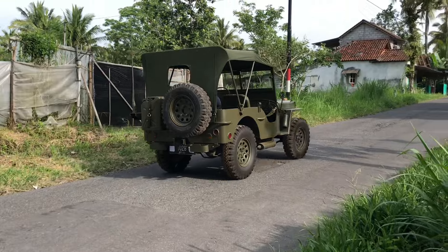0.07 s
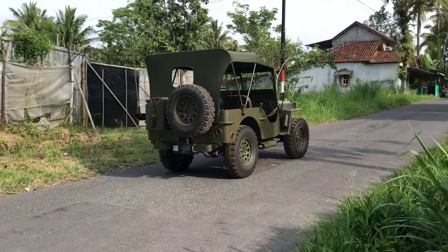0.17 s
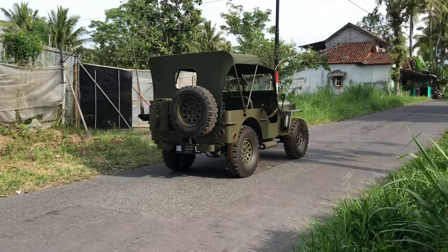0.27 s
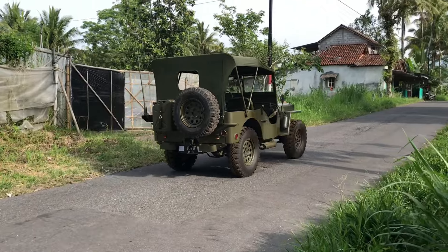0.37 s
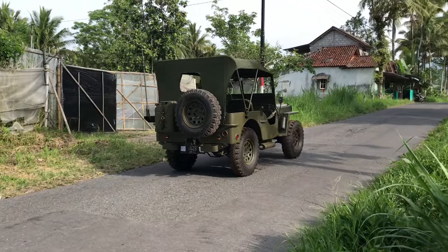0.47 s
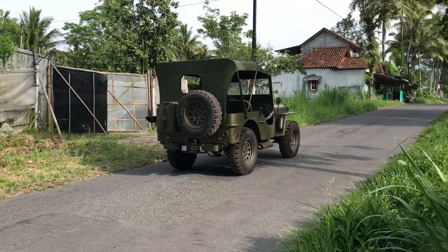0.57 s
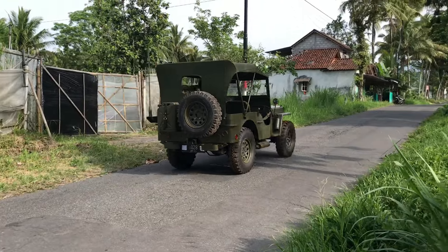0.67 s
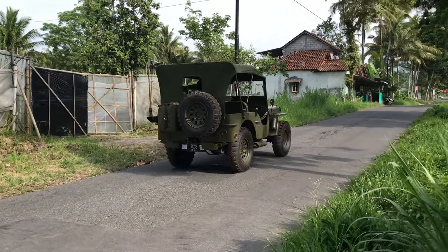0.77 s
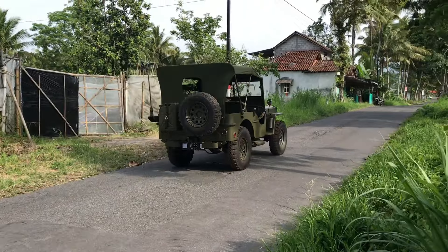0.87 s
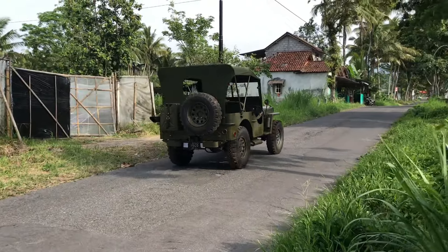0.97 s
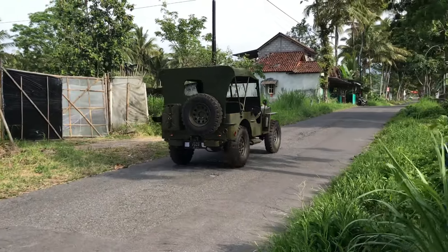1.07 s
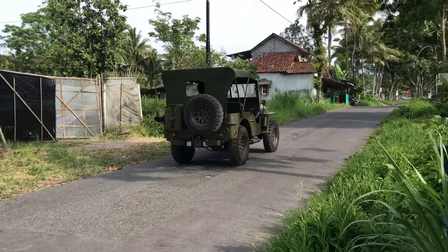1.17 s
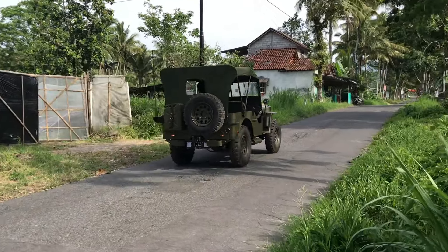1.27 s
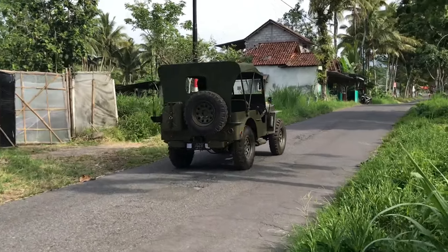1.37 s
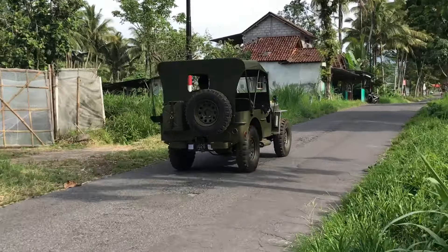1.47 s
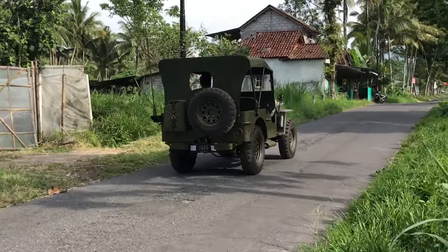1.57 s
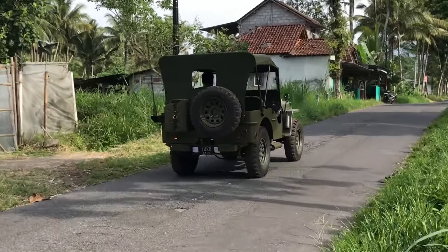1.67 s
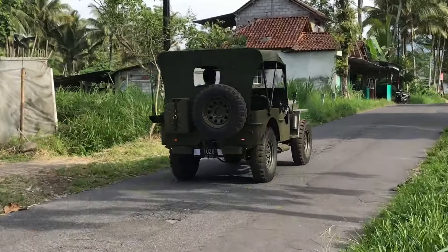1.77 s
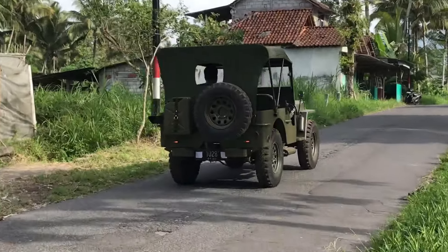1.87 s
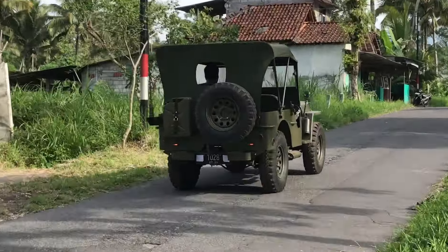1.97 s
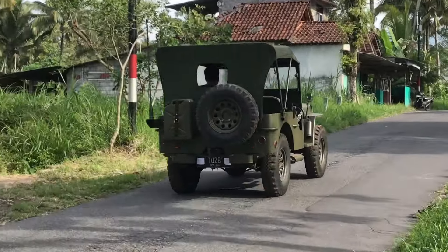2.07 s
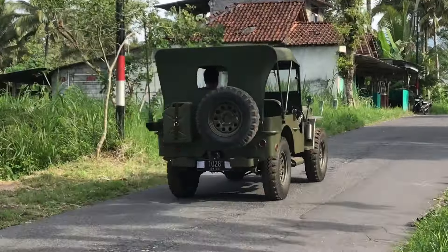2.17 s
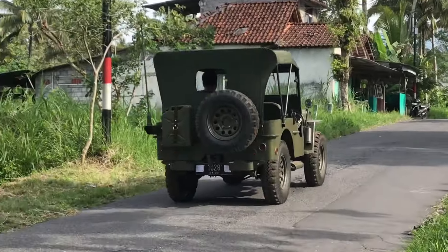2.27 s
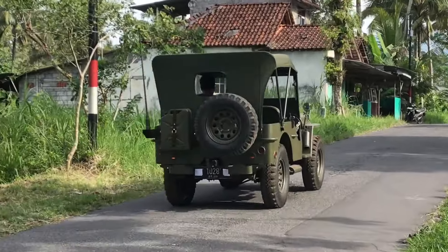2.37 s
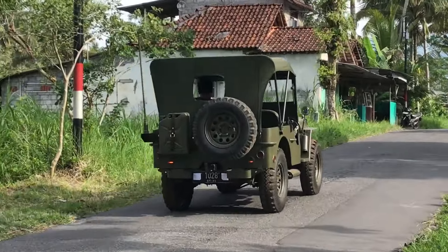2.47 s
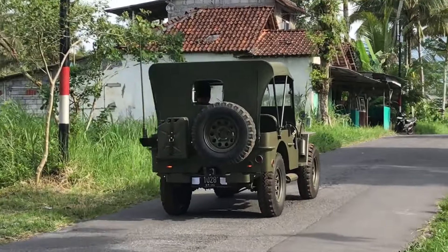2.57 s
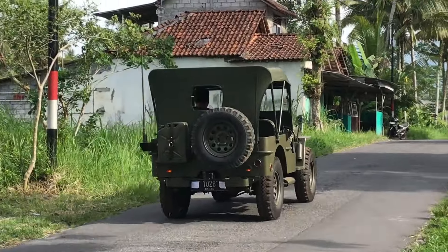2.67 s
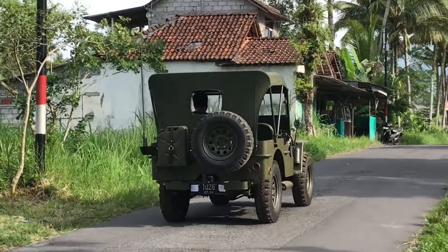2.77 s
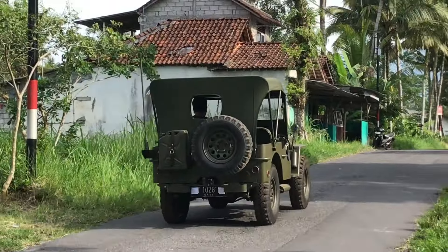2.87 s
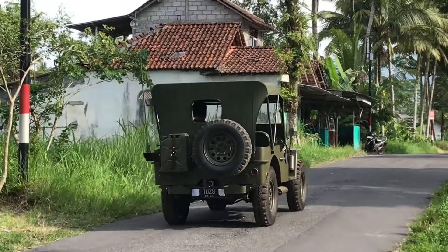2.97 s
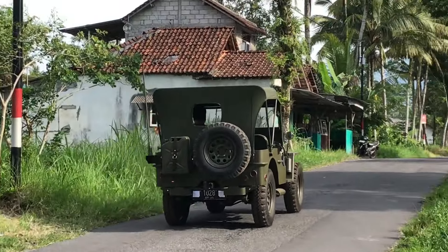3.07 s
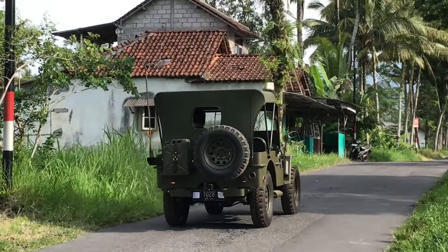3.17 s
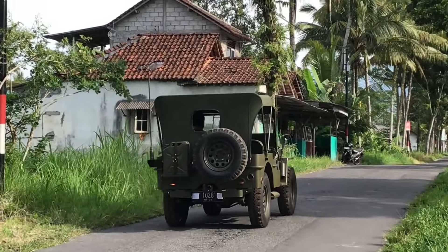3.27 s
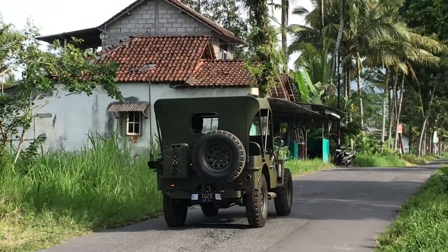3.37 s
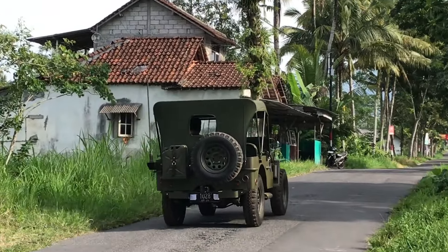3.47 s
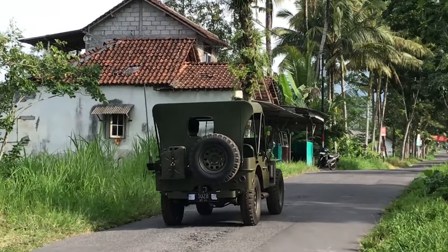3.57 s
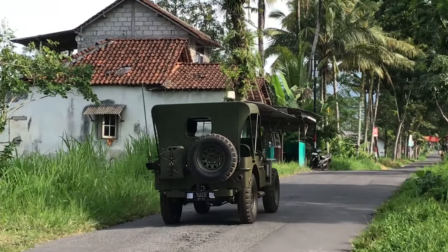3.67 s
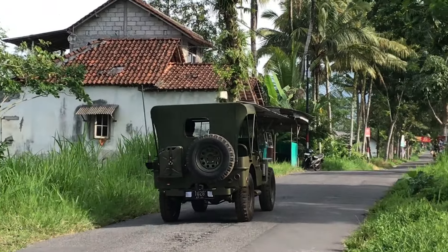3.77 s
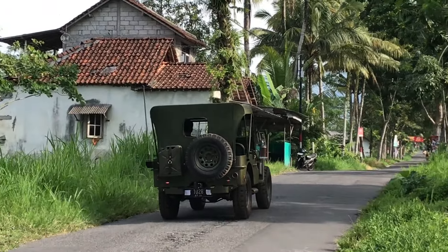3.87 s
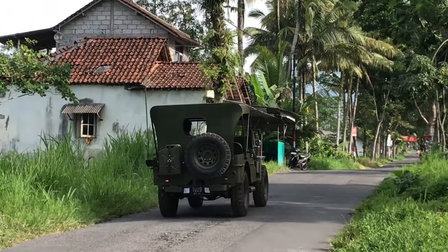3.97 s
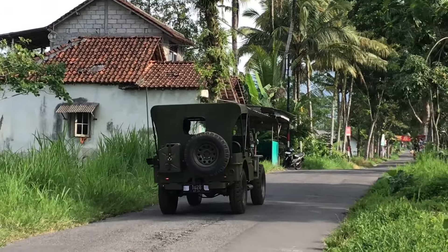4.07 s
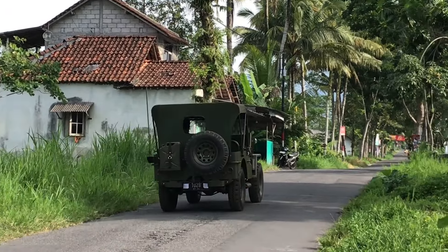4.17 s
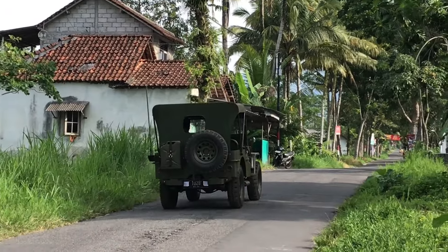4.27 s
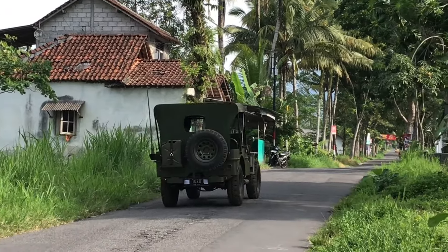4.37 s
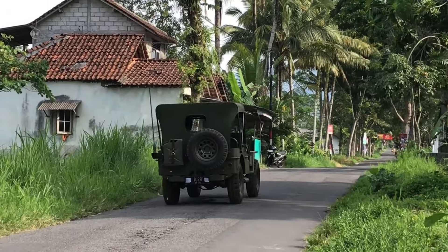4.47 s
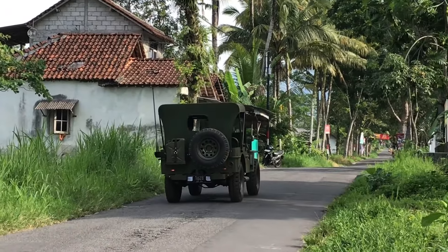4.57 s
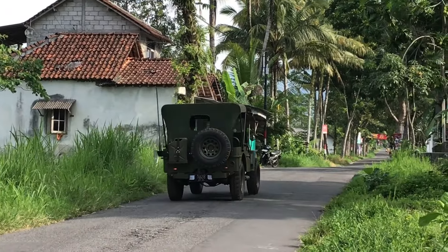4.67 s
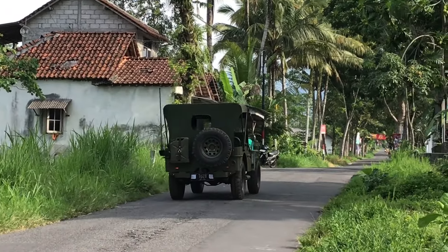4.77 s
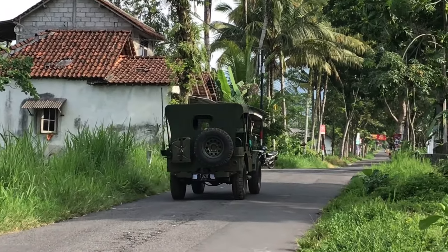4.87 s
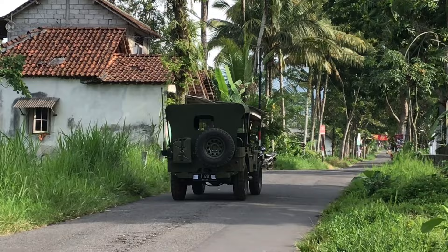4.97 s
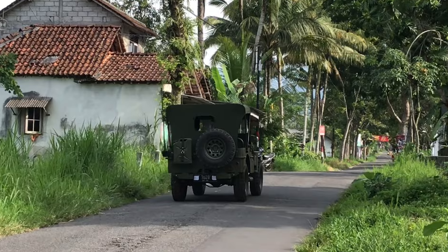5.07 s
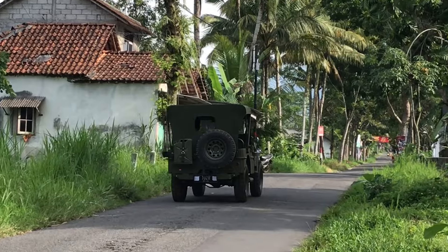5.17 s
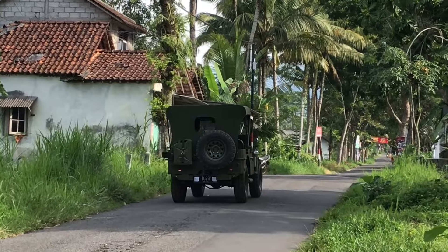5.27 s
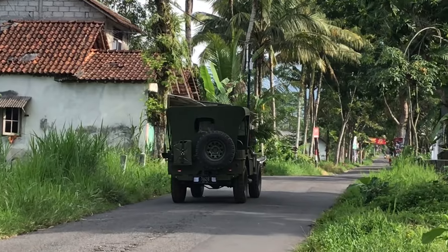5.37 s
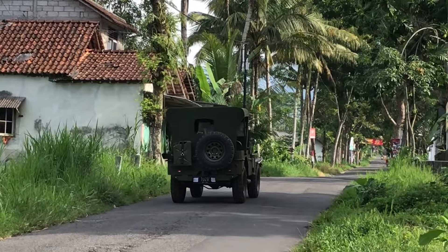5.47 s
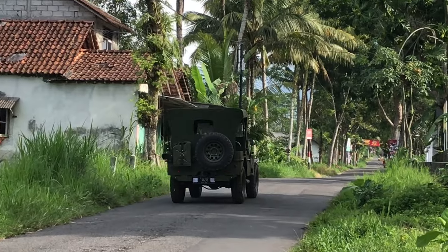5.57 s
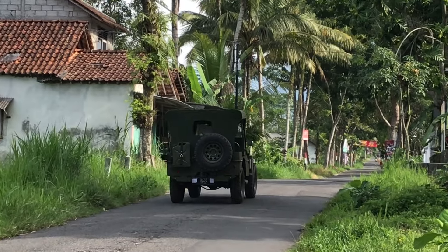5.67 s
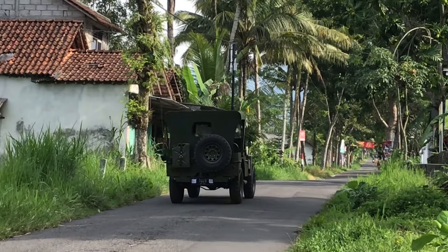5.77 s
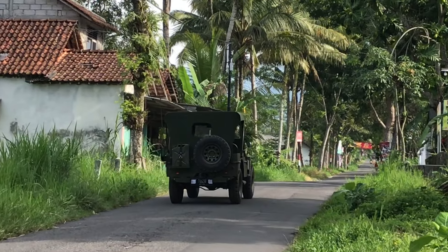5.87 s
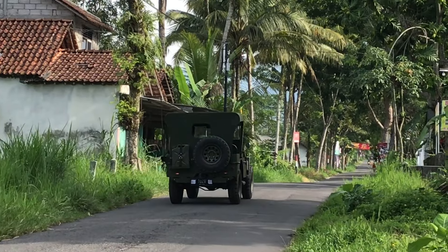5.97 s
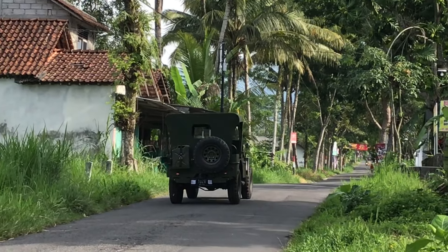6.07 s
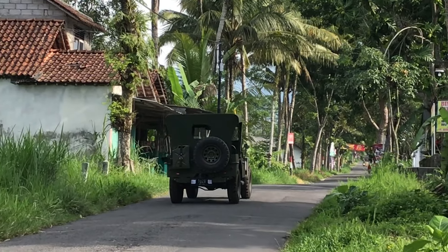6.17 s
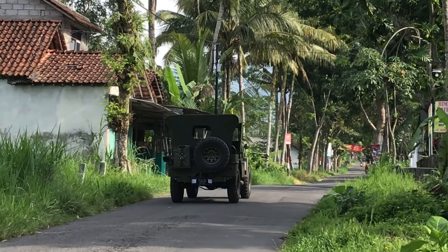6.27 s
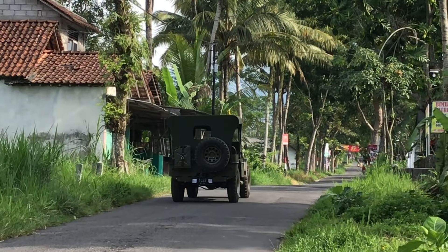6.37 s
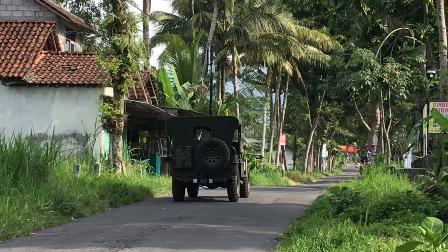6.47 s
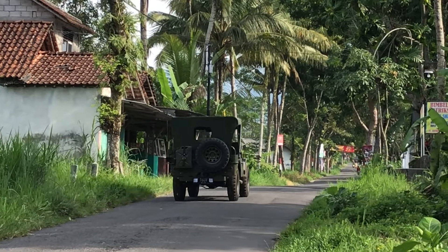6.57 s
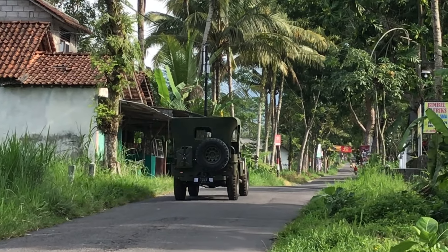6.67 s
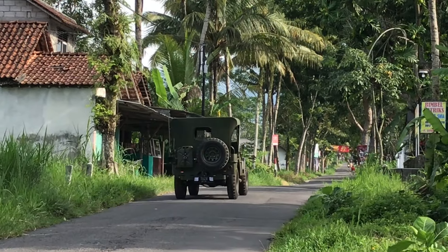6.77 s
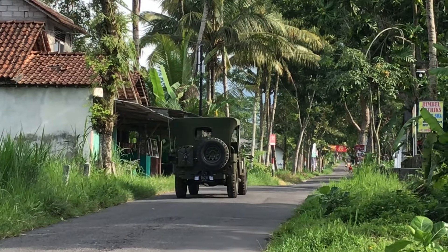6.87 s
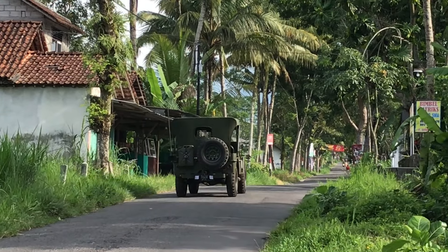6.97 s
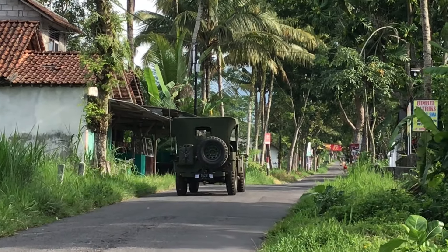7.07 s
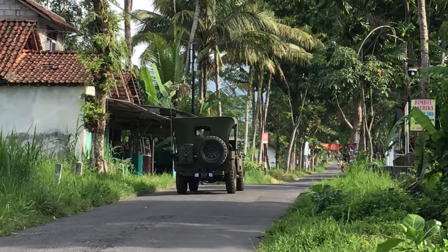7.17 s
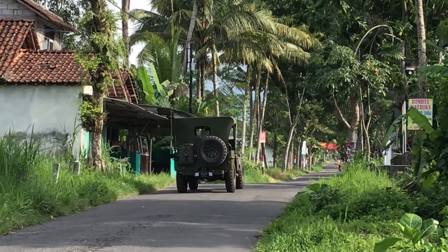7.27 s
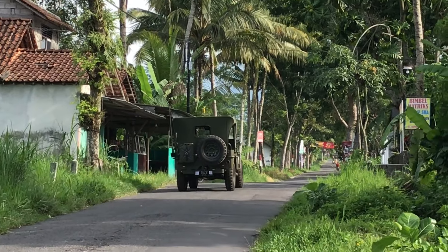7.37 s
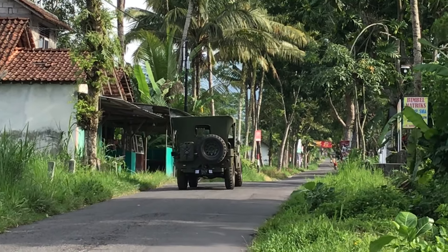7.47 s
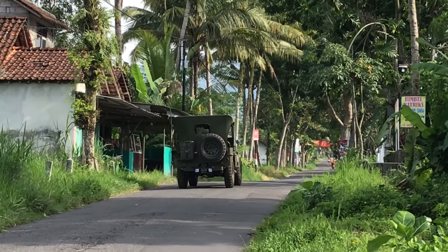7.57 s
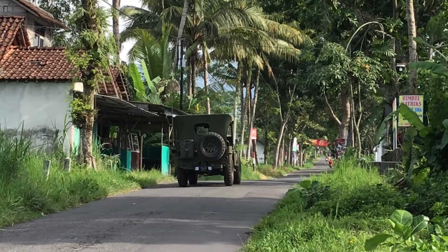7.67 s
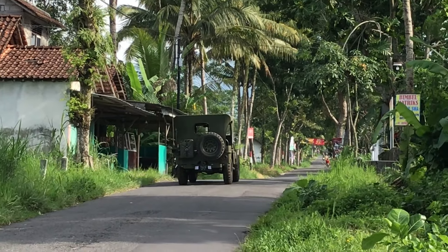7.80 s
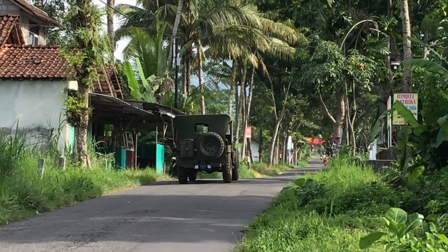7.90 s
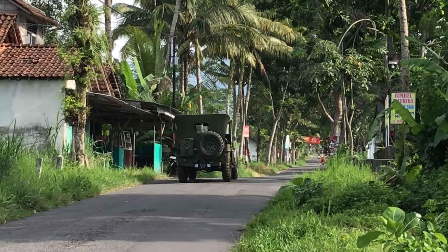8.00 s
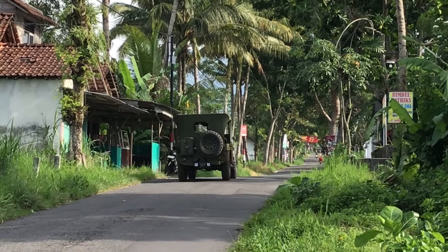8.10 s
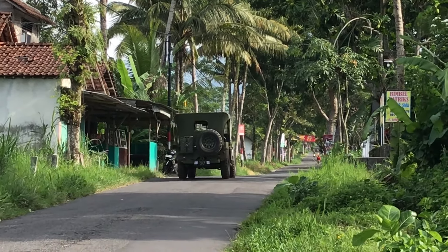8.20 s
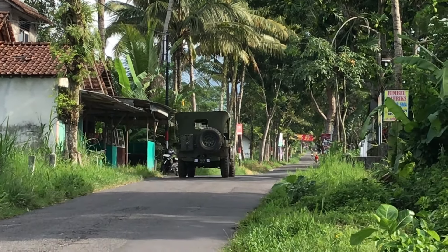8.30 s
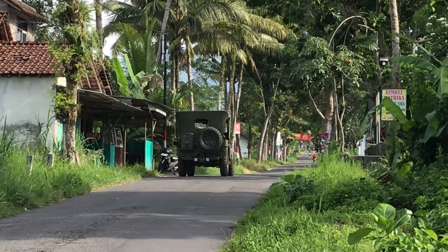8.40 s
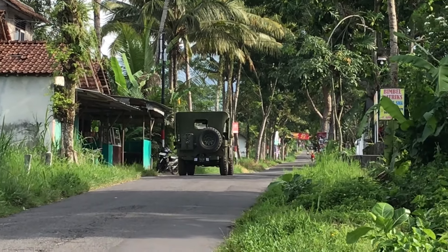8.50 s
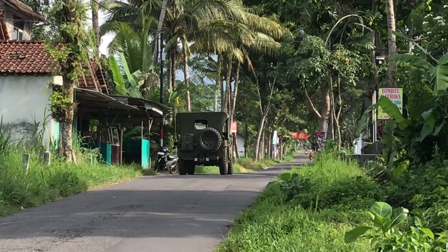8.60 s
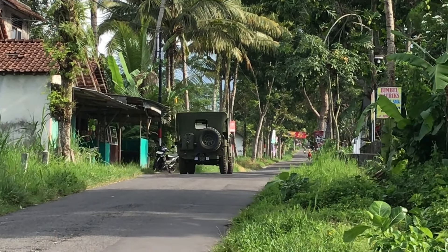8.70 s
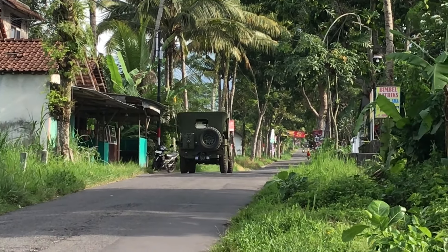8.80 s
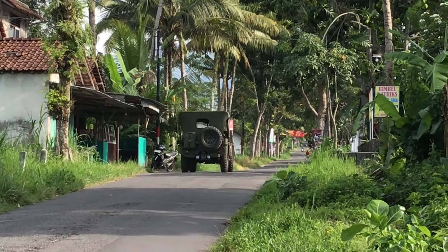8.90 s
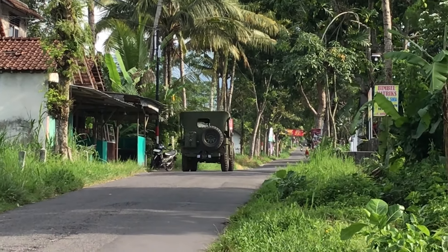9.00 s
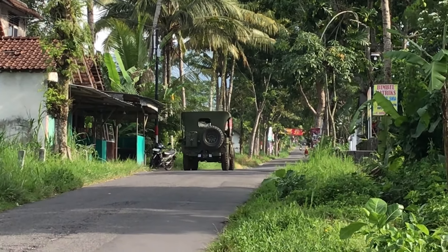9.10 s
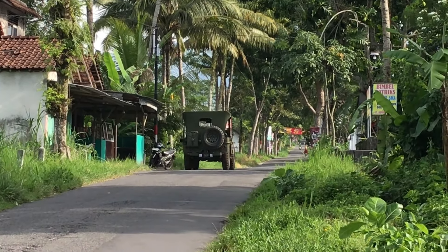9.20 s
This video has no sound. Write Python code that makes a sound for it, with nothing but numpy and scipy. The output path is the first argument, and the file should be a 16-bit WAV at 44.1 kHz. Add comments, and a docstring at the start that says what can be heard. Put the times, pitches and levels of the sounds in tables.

```python
"""An old four-cylinder off-road car pulls away along a village road, in 9.2 seconds of sound.
Insects sing in the verges throughout, one of them a bush cricket buzzing in bouts 1.5 s apart.
The exhaust booms loudest at 2-3.5 s as speed builds in one gear, then weakens; the fan drones most near 4 s.
Gears whine, metal clatters and gas hisses as the car recedes. Near 8 s a bird chips, then again fainter.
Engine tones are sines locked to the firings; the rough layers are noise and knocks, shaped and filtered."""
import sys
import numpy as np
from scipy import signal
from scipy.fft import rfft, irfft, next_fast_len
from scipy.io import wavfile
from scipy.ndimage import map_coordinates

SR = 44100
rng = np.random.default_rng(int(sys.argv[2]) if len(sys.argv) > 2 else 0)


def inscribe(sig):
    """Save sig as 16-bit PCM at rate SR to the path in sys.argv[1].

    A 1-D sig is mono; a 2-D sig holds one channel per row.
    Samples are clipped to [-1, 1] before scaling.
    """
    pcm = np.round(np.clip(np.atleast_2d(sig).T, -1, 1) * 32767)
    wavfile.write(sys.argv[1], SR, pcm.astype(np.int16))


N = 407474
TIME = np.arange(N) / SR   # seconds
SIZE = next_fast_len(N + SR // 4)   # room for filters to ring out
FREQS = np.maximum(np.arange(SIZE // 2 + 1) * SR / SIZE, 1)   # Hz


def from_db(db):
    """Turn decibels into a gain."""
    return 10 ** (np.asarray(db) / 20)


def rms_one(x):
    """Scale a signal to an rms (average strength) of 1."""
    return x / np.sqrt(np.mean(x ** 2) + 1e-20)


def in_time(rows):
    """Join the points of a curve with straight lines, giving each column at every sample."""
    seconds, *columns = np.transpose(rows)
    return [np.interp(TIME, seconds, column) for column in columns]


def at_hz(spectrum, hz):
    """Read a spectrum's dB at the given frequencies, evenly in pitch between its points."""
    points, db = np.transpose(spectrum)
    return np.interp(np.log(hz), np.log(points), db)


def drift(rate):
    """Wander smoothly by chance, with rms 1, changing about rate times a second."""
    knots = rng.standard_normal(4096)
    return rms_one(map_coordinates(knots, [TIME * rate], order=2, mode="mirror"))


def filtered(x, response):
    """Pass a sound through a frequency response."""
    return irfft(rfft(x, SIZE) * response, SIZE)[:N]


def coloured_noise(spectrum):
    """Shape noise to a spectrum and roll it off below the first point; rms 1."""
    lowest_hz = spectrum[0][0]
    roll_off = np.hypot(1, (lowest_hz / FREQS) ** 2)
    gain = from_db(at_hz(spectrum, FREQS)) / roll_off
    return rms_one(filtered(rng.standard_normal(N), gain))


def resonance(hz, width):
    """Respond most at one frequency, with gain 1 there; width is in Hz, 3 dB down."""
    return 1 / (1 + 1j * (FREQS ** 2 - hz ** 2) / (FREQS * width))


def resonator(modes):
    """Add resonances side by side with alternating signs."""
    response = 0
    for k, (hz, width, db) in enumerate(modes):
        response = response + (-1) ** k * from_db(db) * resonance(hz, width)
    return response


def noise_band(hz, width):
    """Make a narrow band of noise by applying one resonance twice; rms 1."""
    return rms_one(filtered(rng.standard_normal(N), resonance(hz, width) ** 2))


def strokes(cycles, depth, sharpness):
    """A gain that jumps once a cycle and dies away; rms 1."""
    return rms_one(1 + depth * np.exp(-sharpness * (cycles % 1)))


def firing_samples(firings):
    """Find the samples where the firing count passes a whole number."""
    return np.flatnonzero(np.diff(np.floor(firings)))


def driven(law, rate, metres):
    """Set a layer's gain: it follows engine speed and fades with the distance covered."""
    start_db, db_per_doubling, loss_db_per_m = law
    speed_db = db_per_doubling * np.log2(rate / rate[0])
    return from_db(start_db + speed_db - loss_db_per_m * metres)


# engine speed: (time [s], firing rate [firings/s])
ENGINE_SPEED = [(0, 37.8), (.25, 38.8), (.5, 41.5), (1, 45), (1.75, 52.2), (2.75, 60.9), (3.75, 68.3),
                (5, 74.1), (5.85, 77.5), (6.1, 77.2), (7.45, 81.3), (7.75, 81.2), (8.02, 83.4),
                (8.22, 80.6), (8.75, 83.9), (8.92, 81.2), (9.1, 85.1), (9.24, 83.3)]
METRES_PER_FIRING = .04   # road covered in this gear


def crankshaft():
    """Engine speed adds up to a count of firings, and in one gear to metres of road."""
    rate, = in_time(ENGINE_SPEED)
    firings = np.cumsum(rate) / SR
    return rate, firings, METRES_PER_FIRING * firings


# exhaust boom at the firing rate: (time [s], level [dB])
BOOM_LEVEL = [(0, -19.1), (.5, -14.4), (2, -7.9), (2.8, -7.5), (3.1, -9.9), (3.45, -7.2), (4, -12.4),
              (4.35, -16.1), (4.73, -12.5), (5.4, -18.5), (5.9, -16.1), (6.18, -20.5), (6.6, -19.9),
              (7.65, -24.8), (8.42, -25.4), (8.62, -32.8), (9.24, -31.9)]
# the boom's partials: (multiple of the firing rate, level before the silencer [dB])
BOOM_PARTIALS = [(1, 0), (1.5, -25), (2, -.7), (3, -.7), (4, -3)]
# what the silencer lets through: (frequency [Hz], gain [dB])
SILENCER_GAIN = [(38, -11.4), (45, -4.3), (55, 0), (75, 0), (87, -7), (115, -12.8), (140, -17.8),
                 (160, -22.5), (180, -28), (205, -39), (330, -55)]


def boom(firings, rate, flutter=0.018):
    """The pressure wave at the tailpipe; partials lag, up to a cycle, as they climb past the silencer's resonance."""
    out, silencer_hz, width_hz = 0, 49, 20
    level_db, = in_time(BOOM_LEVEL)
    source_db = level_db - at_hz(SILENCER_GAIN, rate)   # before the silencer
    for multiple, partial_db in BOOM_PARTIALS:
        hz = multiple * rate
        gain = from_db(source_db + partial_db + at_hz(SILENCER_GAIN, hz))
        lag = 2 * np.arctan(2 * (hz - silencer_hz) / width_hz)
        tone = np.sqrt(2) * np.sin(2 * np.pi * multiple * firings - lag)
        out = out - gain * (1 + flutter * drift(30)) * tone
    return out


# the rasp's partials: (multiple of the firing rate, level before tailpipe and distance [dB])
RASP_PARTIALS = [(3, -28), (4, -32), (5, -38.5), (6, -32), (7, -37.5), (8, -44)]
# what the tailpipe lets through: (frequency [Hz], gain [dB])
TAILPIPE_GAIN = [(150, -11), (205, -12.5), (250, 0), (305, -1.5), (335, -9.5), (375, -9.5), (450, -18),
                 (680, -30)]
RASP_LOSS_DB_PER_M = 0.24


def rasp(firings, rate, metres, flutter=0.17):
    """Higher firing overtones swell and lag while they cross the tailpipe's resonance."""
    tones, pipe_hz, width_hz = 0, 257, 48
    for multiple, db in RASP_PARTIALS:
        hz = multiple * rate
        gain = from_db(db + at_hz(TAILPIPE_GAIN, hz)) * (1 + flutter * drift(13))
        lag = np.arctan(2 * (hz - pipe_hz) / width_hz)
        tones = tones + gain * np.sin(2 * np.pi * multiple * firings - lag)
    return from_db(-RASP_LOSS_DB_PER_M * metres) * np.sqrt(2) * tones


# each cylinder's firing, in turn, also used by the ringing: (strength [dB])
CYLINDER_STRENGTH = [0.55, -0.67, -0.033, -2]
# silencer and tailpipe resonances: (frequency [Hz], width [Hz], relative level [dB])
PIPE_MODES = [(61, 29, 2.5), (120.4, 30.5, 1.5), (178.3, 52, -4), (242.4, 87, -6), (331, 79, -11)]
# burble: (level at the start [dB], rise per doubling of speed [dB], loss per metre [dB])
BURBLE_GROWTH = (-25, 0.33, 0.37)


def burble(firings, rate, metres):
    """Unequal firings and gusts of gas ring the pipe between the boom's lines."""
    at = firing_samples(firings)
    uneven = rng.uniform(-.35, .35, 1024)[:len(at)]   # chance differences between firings
    strength = from_db(np.resize(CYLINDER_STRENGTH, len(at))) + uneven
    puffs = np.zeros(N)
    puffs[at] = strength - strength.mean()   # keep only the unevenness
    gusts = rng.standard_normal(N) * strokes(firings, depth=1.0, sharpness=1.3)
    gas = rms_one(puffs) + gusts
    piped = rms_one(filtered(gas, resonator(PIPE_MODES) * resonance(187, 380)))
    return driven(BURBLE_GROWTH, rate, metres) * piped


# resonances of block, gearbox and body panels: (frequency [Hz], width [Hz], relative level [dB])
BODY_MODES = [(588, 82, -1), (719, 98, 1), (809, 87, 1), (1176, 99, -1.5), (1288, 55, 0), (1466, 9.6, -2.5),
              (1623, 76, -7), (1764, 62, -8), (1968, 132, -8.5)]
# ringing: (level at the start [dB], rise per doubling of speed [dB], loss per metre [dB])
RINGING_GROWTH = (-36, 10.75, 0.52)
KNOCK_DB = -8.5   # the firings' own knock against the random rattle


def ringing(firings, rate, metres):
    """Every firing knocks on the block and rattles the panels, which ring at their own pitches."""
    at = firing_samples(firings)
    knocks = np.zeros(N)
    knocks[at] = from_db(np.resize(CYLINDER_STRENGTH, len(at)))
    rattle = rng.standard_normal(N) * strokes(firings, depth=0.36, sharpness=8.1)
    blows = rattle + from_db(KNOCK_DB) * rms_one(knocks)
    return driven(RINGING_GROWTH, rate, metres) * rms_one(filtered(blows, resonator(BODY_MODES)))


# clatter's broad spectrum: (frequency [Hz], relative level per Hz [dB])
CLATTER_SPECTRUM = [(150, -27), (370, -1.5), (560, -6), (850, -5), (1020, -3.5), (1450, -3.5), (1950, -6.5),
                    (2280, -12.5), (2650, -8), (3000, -14), (3400, -10.5), (4200, -11.5), (4900, -19),
                    (9000, -28)]
# clatter: (level at the start [dB], rise per doubling of speed [dB], loss per metre [dB])
CLATTER_GROWTH = (-31, -1.1, 0.11)


def clatter(firings, rate, metres):
    """Valve gear chatters broadly; one loose tappet ticks every fourth firing."""
    ticks = strokes(firings / 4, depth=.5, sharpness=10)
    chatter = coloured_noise(CLATTER_SPECTRUM) * ticks * from_db(.4 * drift(90))
    return driven(CLATTER_GROWTH, rate, metres) * chatter


# hiss's broad spectrum: (frequency [Hz], relative level per Hz [dB])
HISS_SPECTRUM = [(1500, -6), (3000, 0), (4200, 4), (4900, 0), (6000, 2), (7700, -1.5), (9400, -1),
                 (10450, -8.5), (11300, -3), (12800, -1), (13500, -2.5), (14300, -1), (15000, -2.5),
                 (16000, -2)]
# hiss: (level at the start [dB], rise per doubling of speed [dB], loss per metre [dB])
HISS_GROWTH = (-35, 4.2, 0.94)


def hiss(firings, rate, metres):
    """Gas spits out with each firing, most from one cylinder."""
    every_firing = strokes(firings, depth=.4, sharpness=7)
    one_cylinder = strokes(firings / 4, depth=.6, sharpness=22)
    spit = coloured_noise(HISS_SPECTRUM) * every_firing * one_cylinder
    return driven(HISS_GROWTH, rate, metres) * spit * from_db(.65 * drift(250))


# the cooling fan's blade tone: (time [s], level [dB])
FAN_LEVEL = [(0, -53), (1.5, -37), (2.6, -28.5), (4.1, -27), (4.75, -31.5), (6.3, -30.5), (9.24, -34)]
FAN_RATIO = 3.23   # blade passes per firing


def fan(firings, slip=0.041, flutter=0.2):
    """The blade tone of the belt-driven fan, wavering as the belt slips (slip in cycles)."""
    db, = in_time(FAN_LEVEL)
    blades = FAN_RATIO * firings + slip * drift(8.0)
    return from_db(db) * (1 + flutter * drift(14)) * np.sqrt(2) * np.sin(2 * np.pi * blades)


# shaft, gear and accessory tones: (cycles per firing, peak level before casing and distance [dB])
WHINE_TONES = [(2.69, -33), (5.72, -39), (6.46, -38.5), (7.2, -43.5), (7.75, -44.5), (8.22, -39),
               (9.88, -44), (10.52, -39.5), (11.5, -42), (13, -43), (15.92, -47.5), (16.44, -38.5),
               (17.98, -49), (19.1, -47), (21.1, -39.5), (23, -37), (24.75, -37), (32.75, -36.5)]
# gearbox casing resonances: (frequency [Hz], width 6 dB down [Hz], gain [dB])
CASING_MODES = [(215, 35, -3), (510, 110, -4.5), (595, 45, -3.5), (780, 95, .5), (910, 110, -4.5),
                (1085, 50, -6.5), (1200, 115, 0), (1285, 50, -2.5), (1485, 65, -2.5)]


def whine(firings, rate, metres, loss_db_per_m=0.07):
    """Shaft and mesh tones swell and fade as the speed carries them through the casing's resonances."""
    out, backlash, flutter = 0, .004, .45
    for ratio, db in WHINE_TONES:
        response = 0
        for hz, width, mode_db in CASING_MODES:
            response = response + from_db(mode_db) / (1 + (2 * (ratio * rate - hz) / width) ** 2)
        swell = from_db(db) * response * (1 + flutter * drift(16))
        wobble = backlash * ratio * drift(20)   # play in the gears shakes the high tones most
        out = out + swell * np.sin(2 * np.pi * (ratio * firings + wobble))
    return from_db(-loss_db_per_m * metres) * out


# a bush cricket's bouts of buzzing: (start time [s], level before mixing song and scatter [dB])
CRICKET_BOUTS = [(.05, -44), (1.499, -44), (3, -48), (4.52, -44), (6.07, -44), (7.55, -46), (8.9, -45)]
BOUT_ATTACK_S, BOUT_HOLD_S, BOUT_RELEASE_S = .55, .53, .14


def cricket(high_hz=8700, low_hz=8200, scrape=0.11):
    """Each wing stroke is a short falling scrape; the foliage smears part of it. Bouts swell, hold and stop."""
    stroke = (72.8 * TIME) % 1   # 72.8 strokes a second
    pitch = high_hz + (low_hz - high_hz) * stroke
    turns = np.cumsum(pitch) / SR + scrape * drift(420) + drift(70)   # roughened, in cycles
    song = rms_one(np.sin(np.pi * stroke) ** 4 * np.sin(2 * np.pi * turns))
    scattered = noise_band(8480, 500)
    corners = np.cumsum([0, BOUT_ATTACK_S, BOUT_HOLD_S, BOUT_RELEASE_S])
    bouts = 0
    for start, db in CRICKET_BOUTS:
        bouts = bouts + from_db(db) * np.interp(TIME - start, corners, [0, 1, 1, 0])
    return bouts * (.75 * song + .5 * scattered)


# bird chips: (start time [s], pitch when loudest [Hz], peak level of the chip without echo [dB])
BIRD_CHIPS = [(7.915, 6050, -37), (8.025, 6200, -49)]


def bird(length=0.0088, fall=0.035, echo=0.47, echo_s=0.072):
    """Short falling chips, loudest after length seconds, with a little echo from the trees."""
    out, scattered = 0, noise_band(6030, 350)
    for start, hz, db in BIRD_CHIPS:
        age = np.maximum(TIME - start, 0)
        swell = (age / length) ** 2 * np.exp(2 - 2 * age / length)
        pitch = hz * (1 + fall * (1 - np.minimum(age / length, 2)))
        chip = swell * np.sin(2 * np.pi * np.cumsum(pitch) / SR)
        tail = echo * np.exp(-age / echo_s) * np.minimum(age / length, 1)
        out = out + from_db(db) * (chip + tail * scattered)
    return out


# steady chorus of farther insects: (frequency [Hz], half-width 6 dB down [Hz], level [dB])
INSECT_CHORUS = [(6530, 290, -53), (7060, 90, -55), (7470, 90, -55.5), (8230, 210, -50), (8570, 470, -47.5)]
# the insects' wash: (frequency [Hz], relative level per Hz [dB])
VERGE_SPECTRUM = [(2000, 3.5), (3400, 12), (4300, 2), (4900, -7), (5500, 4), (6500, 3), (7800, -17),
                  (8200, -28.5), (9000, -5), (9650, 4.5), (10300, -20), (15000, -28)]


def verge(wash_db=-42):
    """Many far insects merge into a wash with a few narrow bands."""
    bands = 0
    for hz, width, db in INSECT_CHORUS:
        bands = bands + from_db(db) * noise_band(hz, 2 * width)
    return bands + from_db(wash_db) * coloured_noise(VERGE_SPECTRUM)


def scene():
    """One crankshaft drives every sound of the car and carries it away; the verges sing around it."""
    rate, firings, metres = crankshaft()
    exhaust = boom(firings, rate) + rasp(firings, rate, metres) + burble(firings, rate, metres)
    metal = ringing(firings, rate, metres) + clatter(firings, rate, metres)
    gas = hiss(firings, rate, metres)
    drone = fan(firings) + whine(firings, rate, metres)
    wildlife = cricket() + bird() + verge()
    return (exhaust + metal + gas + drone + wildlife)[None]


CUTOFF_HZ = 15800


def record(dry):
    """The microphone drops the deepest rumble, below 18 Hz; the top is cut steeply."""
    thinned = signal.sosfilt(signal.butter(2, 18, "high", fs=SR, output="sos"), dry)
    return signal.sosfilt(signal.ellip(12, .1, 90, CUTOFF_HZ, fs=SR, output="sos"), thinned)


dry = scene()
out = record(dry)
inscribe(out)
```